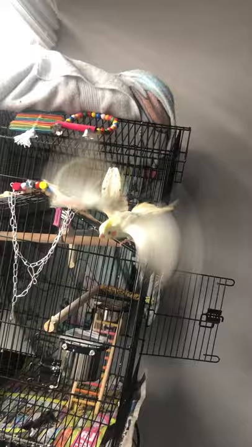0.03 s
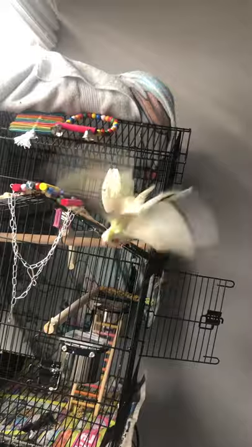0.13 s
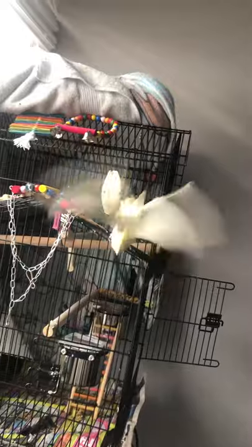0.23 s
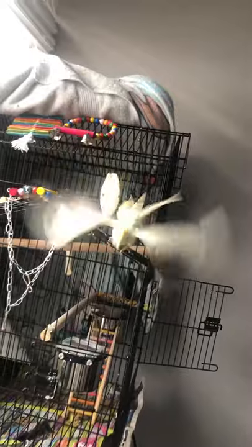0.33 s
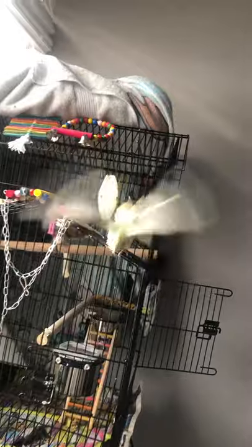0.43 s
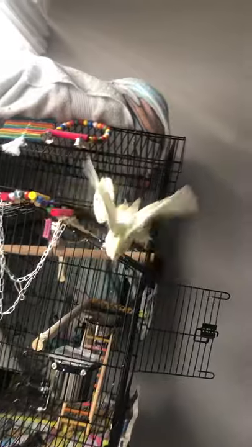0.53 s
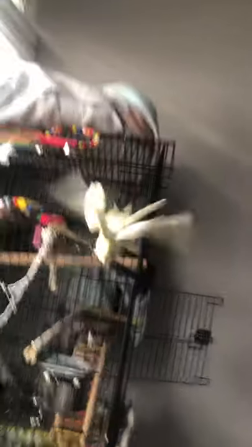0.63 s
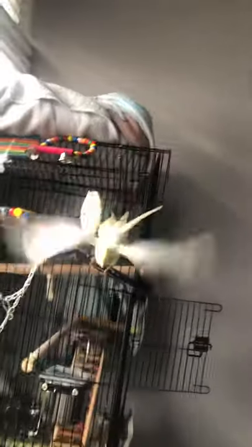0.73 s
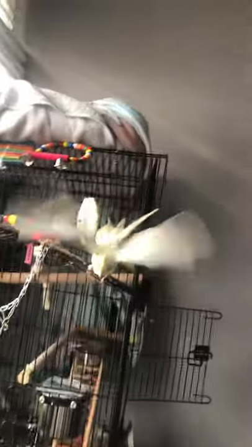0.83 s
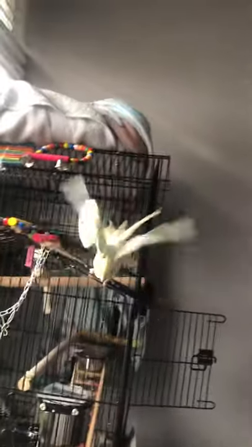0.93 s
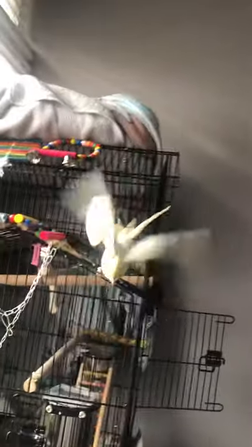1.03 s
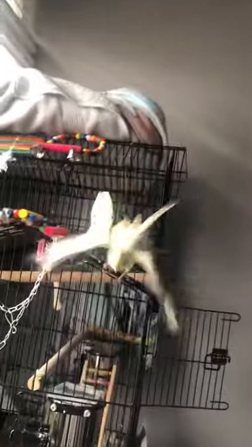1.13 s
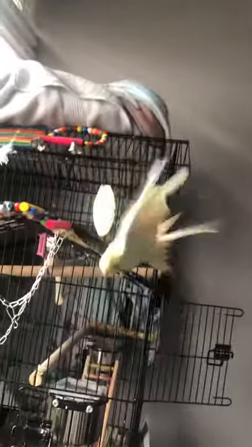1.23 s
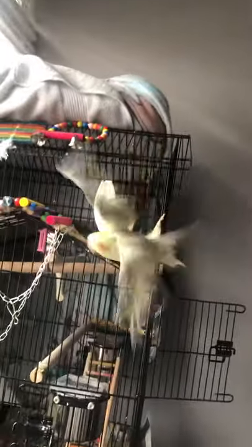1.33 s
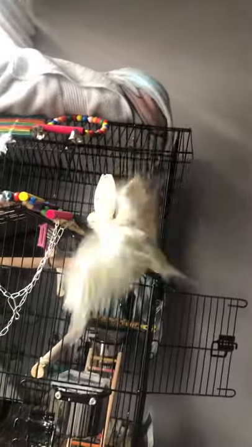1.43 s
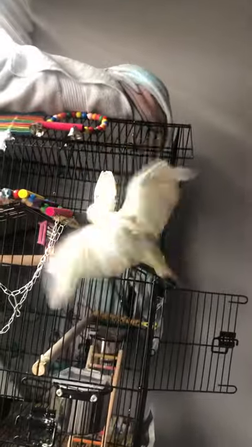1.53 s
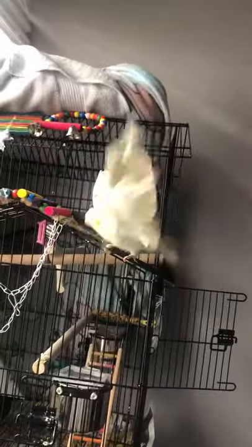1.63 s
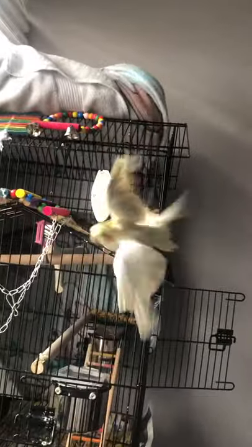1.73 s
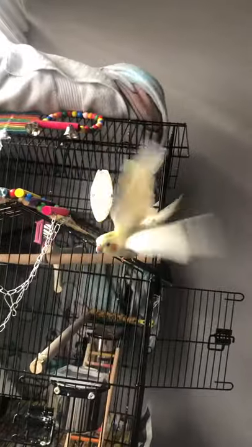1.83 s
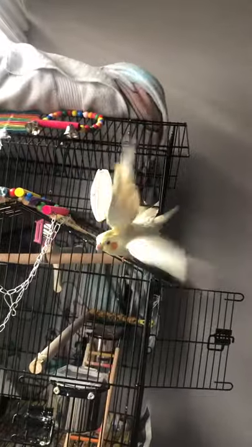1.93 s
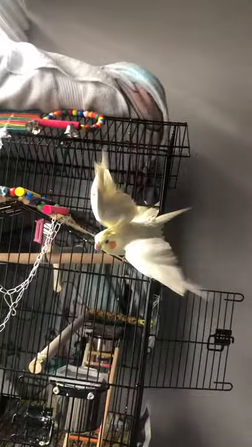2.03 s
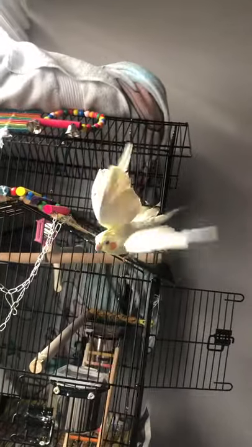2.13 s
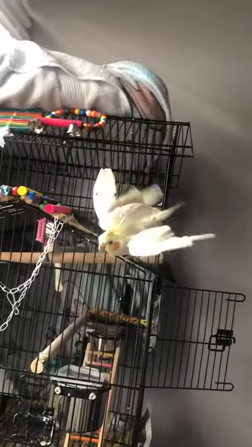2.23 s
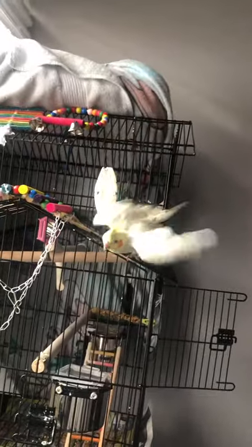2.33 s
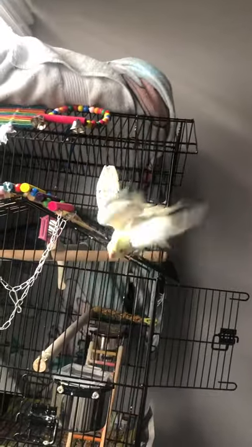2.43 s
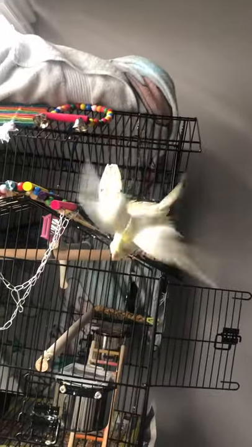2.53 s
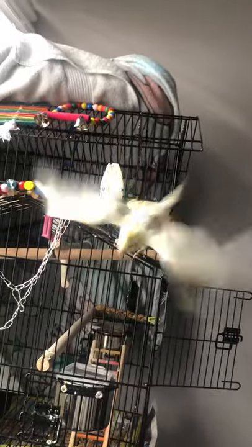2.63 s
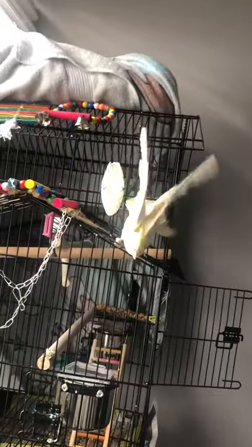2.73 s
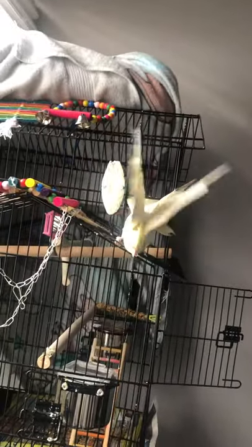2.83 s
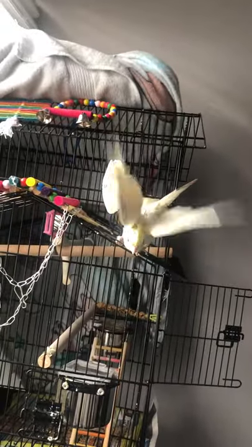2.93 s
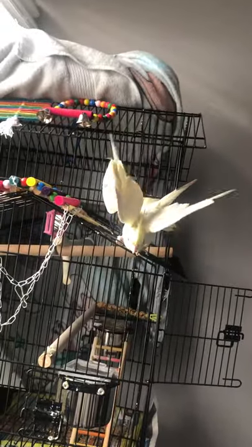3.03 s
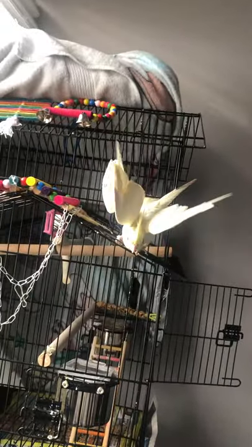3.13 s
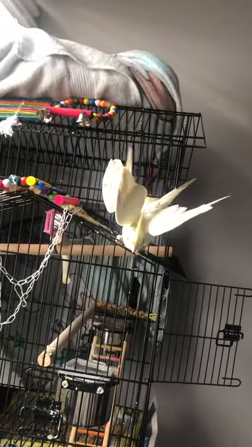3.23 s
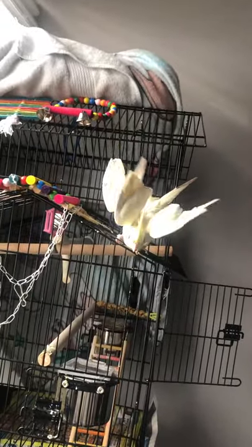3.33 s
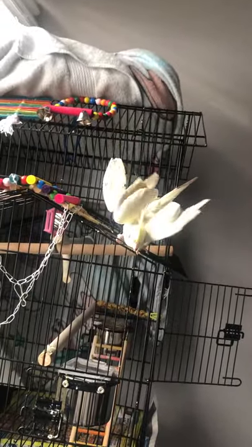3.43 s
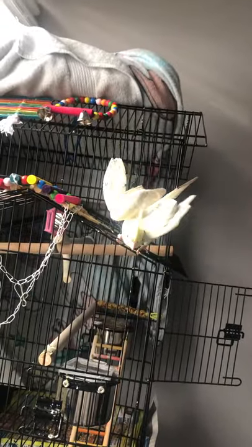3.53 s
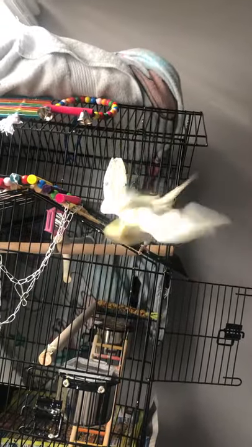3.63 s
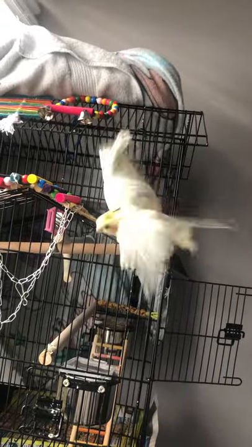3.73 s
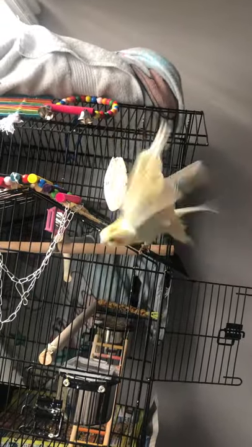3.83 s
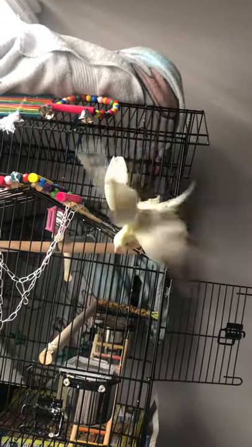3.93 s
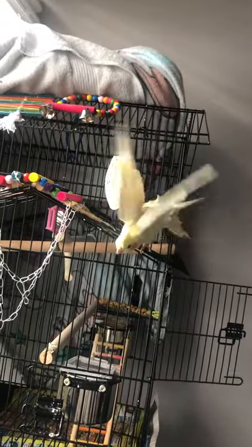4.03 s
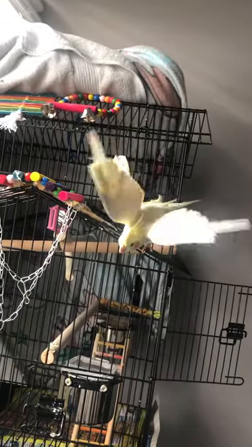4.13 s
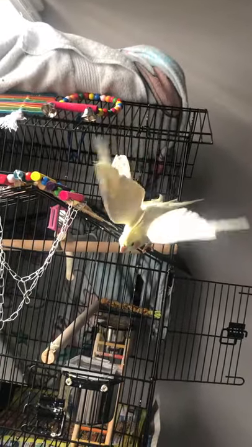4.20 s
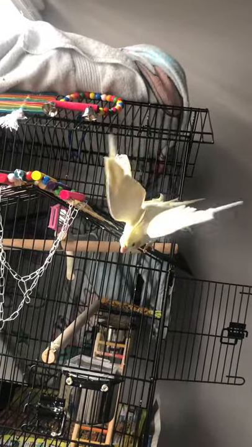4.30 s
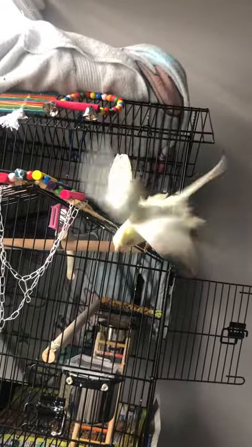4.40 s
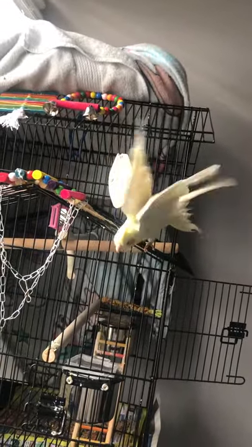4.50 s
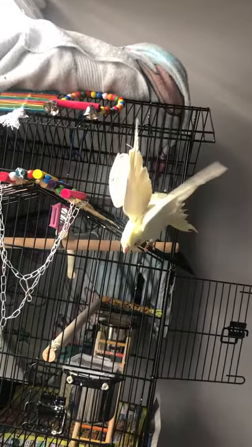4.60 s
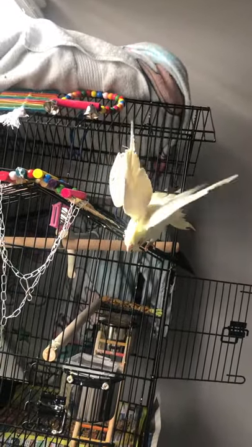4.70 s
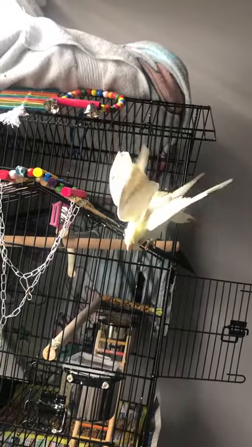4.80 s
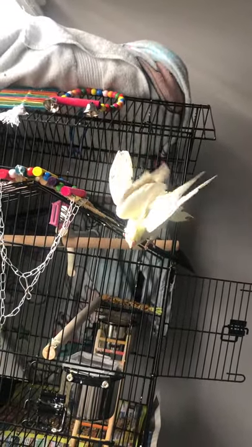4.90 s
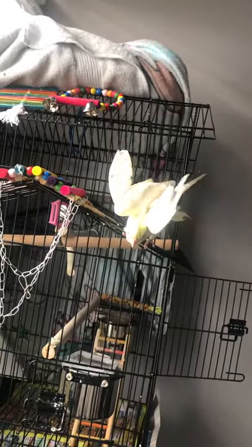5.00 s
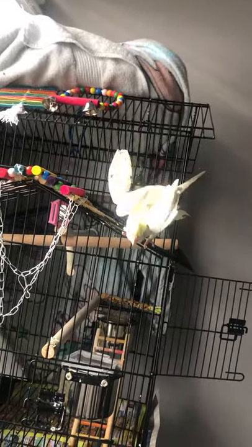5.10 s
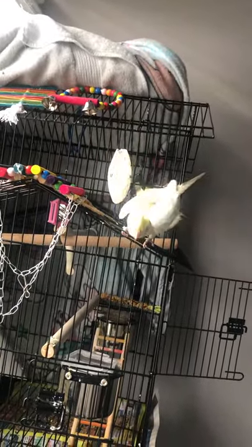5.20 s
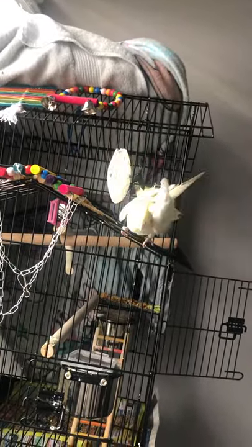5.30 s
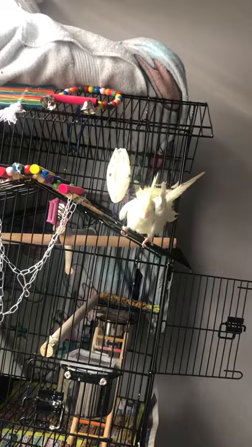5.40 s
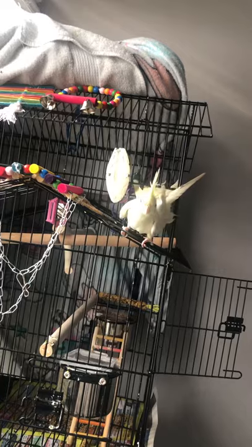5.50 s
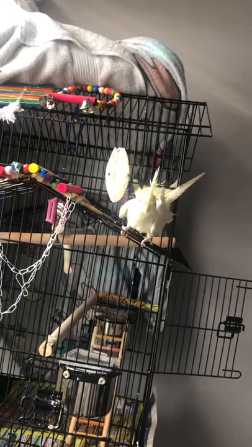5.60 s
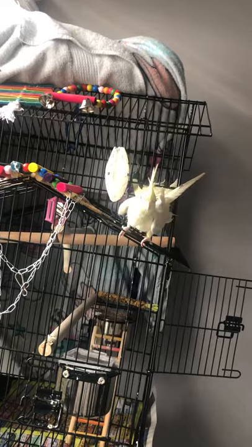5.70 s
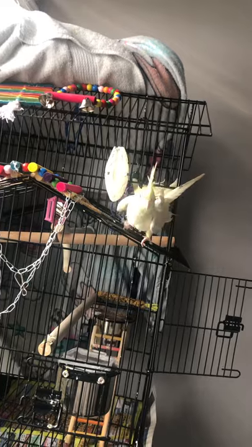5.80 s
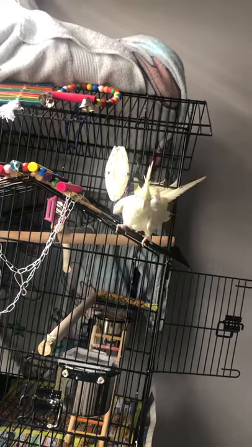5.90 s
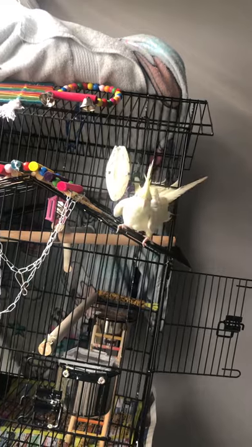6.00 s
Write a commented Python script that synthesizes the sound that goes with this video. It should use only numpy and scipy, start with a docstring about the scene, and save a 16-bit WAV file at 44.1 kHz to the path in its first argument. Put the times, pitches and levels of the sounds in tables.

```python
"""A cockatiel beats its wings, clinging to the top of a wire cage in a small room.
The feathers swish, push soft puffs of air and slap the wires; the shaken cage rattles and its bars ring.
At the end the bird folds its wings and ruffles its plumage over a low room rumble."""
import sys
import numpy as np
from scipy import signal
from scipy.fft import rfft, irfft, next_fast_len
from scipy.io import wavfile

SR = 44100
rng = np.random.default_rng(int(sys.argv[2]) if len(sys.argv) > 2 else 0)


def pcm_store(signal):
    """Save signal as 16-bit PCM."""
    levels = np.round(np.clip(np.atleast_2d(signal), -1, 1) * 32767)
    wavfile.write(sys.argv[1], SR, levels.astype(np.int16).T)


N = 266849
TIME_S = np.arange(N) / SR


# start_s, end_s, period_s, growth_s_per_beat, rattle_lead_s, rattle_re_swish_db
FLAP_BOUTS = [(0.088, 1.08, 0.101, 0.005, 0.053, 17.5), (1.222, 1.93, 0.108, 0, 0.022, 12.5),
              (2.15, 2.6, 0.123, 0, 0.01, 1), (3.585, 3.95, 0.106, 0, 0.002, 11.5)]
# time_s, swish_db
BEAT_EFFORT = [(0.08, -58.5), (0.3, -57.5), (0.76, -61.5), (1.03, -69), (1.22, -52.5), (1.44, -55),
               (1.88, -70), (2.15, -72), (2.52, -61), (3.58, -60), (3.69, -55), (3.9, -70)]

def wingbeats():
    """Even or slowing strokes that rock the cage. Rows: time_s, swish_db, rattle_s, rattle_db."""
    full_effort_db = -52
    rows = []
    for s, end_s, period_s, growth_s, lead_s, rattle_db in FLAP_BOUTS:
        while s < end_s:
            down_db = np.interp(s, *np.transpose(BEAT_EFFORT))
            up_db = down_db - 3 + 0.6 * (down_db - full_effort_db)  # upstrokes fade faster
            for stroke_s, db in [(s, down_db), (s + period_s / 2, up_db)]:
                rows.append((stroke_s, db, stroke_s - lead_s, db + rattle_db))
            s += period_s
            period_s += growth_s
    return rows


# peak_s, puff_db, half_length_s
HEAVY_DOWNSTROKES = [(0.295, -55, 0.02), (1.072, -51, 0.016), (1.36, -56.5, 0.06), (1.535, -52, 0.03),
                     (2.564, -59.5, 0.036), (3.637, -53, 0.015), (3.672, -50, 0.014), (4.32, -60, 0.02)]
# peak_s, swish_db, half_length_s
WING_FOLDS = [(3.31, -77.5, 0.059), (3.95, -72, 0.03), (4.12, -77, 0.04), (4.71, -76.5, 0.043),
              (4.85, -73.5, 0.069), (5.15, -79.5, 0.09)]
# freq_hz, density_db
SWISH_SPECTRUM = [(150, -22.5), (500, 0), (1200, -2.5), (2800, 1), (5000, -1.5), (8000, 1.5), (13000, -2.5),
                  (16000, -5.5)]

def wing_swish(half_length_s=0.022):
    """Vanes brush through the air and over each other as the wings beat and fold."""
    beats = [(s, db, half_length_s) for s, db, _, _ in wingbeats()]
    heavy = [(s, puff_db - 5, half_s) for s, puff_db, half_s in HEAVY_DOWNSTROKES]
    return swells(beats + heavy + WING_FOLDS) * noise(SWISH_SPECTRUM, grain_db=4.0)


# freq_hz, density_db
PUFF_SPECTRUM = [(20, -8), (45, -4), (110, 1.5), (180, -4), (280, -13), (550, -9), (1200, -29.5)]

def air_puffs(half_length_s=0.025):
    """Each stroke pushes a soft thud of air."""
    beats = [(s, swish_db - 5, half_length_s) for s, swish_db, _, _ in wingbeats()]
    air = swells(beats + HEAVY_DOWNSTROKES) * noise(PUFF_SPECTRUM)
    return air + amp(-7) * echo(air)


# freq_hz, gain_db
CRACK_SPECTRUM = [(60, -8), (180, -2), (350, -3.5), (700, -1), (2000, -0.5), (4000, -1.5), (8000, -0.5),
                  (13000, -1.5), (16000, -9)]
# start_s, strength_db, bright_hz, bright_db, body_db, echo_trim_db
WING_SLAPS = [(0.062, -27.5, 7040, 0.5, -1, 4), (0.169, -24, 8500, 6.5, -2.5, 3),
              (0.180, -25, 7000, 4.5, 2.5, 0), (0.279, -26, 6000, 1.5, 0, -3.5),
              (0.2958, -16, 7500, 4.5, 2.5, -2.5), (0.522, -32.5, 9000, 1.5, 2, -0.5),
              (0.759, -30, 12500, 3, -1, 2), (0.777, -30, 4960, 3, -1, -2.5), (1.061, -22, 1000, 4.5, 3, 2),
              (1.065, -14.5, 1300, 3.5, 6, 4), (1.325, -24.5, 6500, 3.5, -1.5, -1),
              (1.5186, -14.5, 5000, 3, -3, -5), (1.5386, -19, 6770, 2, -3, -3),
              (2.338, -30, 3040, 1.5, 3.5, 1), (2.5355, -18, 11000, 0.5, -1.5, 1),
              (2.543, -18, 6500, 2, 3.5, -1.5), (2.568, -19, 5900, 3.5, -1, 0),
              (3.620, -20.5, 2700, 6, -3, -0.5), (3.6618, -21.5, 7800, 2.5, 5, 0),
              (3.802, -33, 4070, 1, 2, 2), (4.2955, -12, 8150, 7, -2, 3), (4.306, -14.5, 7900, 8, 1, 1)]

def wing_slaps(t, tones, square_hit_db=-14, ring_db=-16):
    """A quill cracks on a wire, the neighbouring feathers clatter after it and the bars ring."""
    track = np.zeros(N)
    for s, db, bright_hz, bright_db, body_db, echo_trim_db in WING_SLAPS:
        def colour_db(hz):
            """A stiff tip favours one pitch region; the flat of the wing adds low body."""
            tip_db = bright_db * np.exp(-(np.log2((hz + 1) / bright_hz) / 0.43) ** 2)
            return along(CRACK_SPECTRUM, hz) + tip_db + body_db / (1 + (hz / 1500) ** 2)

        graze_db = max(square_hit_db - db, 0)  # weaker slaps graze and clatter more
        clatter_s = 0.0045 + 0.0003 * graze_db
        crack = burst(coloured(rng.standard_normal(len(t)) * np.exp(-t / 0.0004), colour_db))
        clatter = burst(coloured(contacts(t, clatter_s, spread_db=4.0), colour_db))
        hit = burst(crack + amp(-3 + 0.5 * graze_db) * clatter)
        slap = hit + amp(echo_trim_db - 5) * echo(hit) + amp(ring_db) * bar_ring(tones)
        add(track, s, amp(db - 9) * slap)
    return track


# start_s, strength_db, rocking_period_s
CAGE_JOLTS = [(1.453, -36.5, 0.108), (1.727, -44, 0.068), (2.613, -42.5, 0.064), (3.8, -44, 0.058),
              (4.432, -44.5, 0.05)]
# freq_hz, gain_db
BUZZ_SPECTRUM = [(200, -13), (700, -2), (1050, -11), (1350, -7), (1650, -11), (1980, 5), (2450, -14),
                 (2900, -9), (3250, 0), (3720, -14), (4250, 0.5), (4700, -12), (5150, -7), (5700, -16),
                 (6300, -6.5), (7000, -20), (15000, -28)]

def cage_rattles(t, tones, rebound_loss_db=9):
    """At every wingbeat and rebound, wire buzzes against wire and leaves the bars ringing."""
    track = np.zeros(N)
    attack = 1 - np.exp(-t / 0.0035)
    beats = [(s, db) for _, _, s, db in wingbeats()]
    rebounds = [(s + k * period_s, db - k * rebound_loss_db)
                for s, db, period_s in CAGE_JOLTS for k in range(3)]
    for s, db in beats + rebounds:
        chatter = attack * contacts(t, length_s=0.013, spread_db=3.5)
        buzz = burst(coloured(chatter, lambda hz: along(BUZZ_SPECTRUM, hz)))
        rattle = amp(2.5) * buzz + amp(-1.5) * echo(buzz) + amp(2) * attack * bar_ring(tones)
        add(track, s, amp(db) * rattle)
    return track


# pitch_hz, spread_hz, relative_db, t60_s
BAR_FAMILIES = [(478, 14, -10, 1.2), (685.6, 54, -2.5, 0.7), (782, 16, -4.5, 1.24), (1327, 70, -8, 0.82),
                (1669, 14, -12, 1.4), (1883, 20, 0.5, 0.58), (2012, 120, 1, .45), (3120, 60, -1, .4),
                (3354, 120, -3.5, .4), (4164, 57, 0, 0.37), (4420, 220, -6.5, .3), (5180, 240, -8.5, .3),
                (6160, 110, -8.5, 0.35)]

def bar_tones(t, bars_per_family=7):
    """One decaying complex tone per bar; nearly equal bars are slightly out of tune."""
    return np.array([amp(db - 60 * t / t60_s) * np.exp(2j * np.pi * (hz + spread_hz * offset) * t)
                     for hz, spread_hz, db, t60_s in BAR_FAMILIES
                     for offset in np.linspace(-1, 1, bars_per_family)
                     + rng.normal(0, 0.104, bars_per_family)])


def bar_ring(tones):
    """Each blow shares itself out anew among the bars."""
    shares = rng.standard_normal(len(tones)) + 1j * rng.standard_normal(len(tones))
    return burst((shares @ tones).real)


# time_s, level_db
RUFFLE_ENVELOPE = [(5.66, -100), (5.69, -64), (5.73, -69), (5.742, -60), (5.78, -70), (5.83, -71.5),
                   (5.92, -88.5)]
# freq_hz, density_db
RUFFLE_SPECTRUM = [(200, -12), (700, -1), (2000, -5.5), (3000, -6.5), (3900, 2.5), (5200, -6.5),
                   (6600, -1.5), (9000, -7.5), (14000, -8.5), (16000, -13)]

def plumage_ruffle():
    """Plumage shaken out in a short, grainy rustle."""
    level_db = np.interp(TIME_S, *np.transpose(RUFFLE_ENVELOPE), left=-120, right=-120)
    return amp(level_db) * noise(RUFFLE_SPECTRUM, grain_db=3.5)


# freq_hz, t60_s
ROOM_DECAY = [(150, 0.39), (1000, 0.44), (4000, 0.39), (8000, 0.27), (15000, .2)]

def echo(x):
    """Room reverberation from a unit-energy tail; the treble dies first."""
    hz, t, spectra = signal.stft(rng.standard_normal(SR // 2), SR, nperseg=256)
    decay = amp(-60 * t / along(ROOM_DECAY, hz)[:, None])
    tail = signal.istft(spectra * decay, SR, nperseg=256)[1]
    tail *= 1 - np.exp(-np.arange(len(tail)) / SR / 0.0021)
    return signal.fftconvolve(x, tail / np.linalg.norm(tail))[:len(x)]


# freq_hz, density_db
RUMBLE_SPECTRUM = [(15, -51.5), (25, -21.5), (48, -8.5), (123, -5.5), (200, -5), (439, -12), (560, -18.5),
                   (775, -17.5), (936, -22.5), (1700, -26), (2410, -28), (12200, -30), (16000, -37.5)]

def room_tone(hum_hz=60.5):
    """Low rumble and faint hiss with a trace of mains hum."""
    return amp(-67.5) * noise(RUMBLE_SPECTRUM) + amp(-74.5) * np.sin(2 * np.pi * hum_hz * TIME_S)


def swells(rows):
    """Bell-shaped envelopes summed in power."""
    return np.sqrt(sum(amp(db) ** 2 * np.exp(-((TIME_S - s) / half_s) ** 2) for s, db, half_s in rows))


def contacts(t, length_s, spread_db):
    """A dying shower of tiny contacts of very unequal size."""
    sizes = np.repeat(amp(spread_db * rng.standard_normal(len(t))), 8)[:len(t)]
    return rng.standard_normal(len(t)) * sizes * np.exp(-(t / length_s) ** 2)


def noise(spectrum, grain_db=0):
    """Coloured noise of rms 1, optionally in millisecond grains."""
    count = N // 40 + 2
    grains = np.interp(TIME_S, np.arange(count) * 40 / SR, rng.standard_normal(count))
    x = coloured(rng.standard_normal(N) * amp(grain_db * grains), lambda hz: along(spectrum, hz))
    return x / np.sqrt(np.mean(x ** 2) + 1e-20)


def coloured(x, gain_db):
    """Minimum-phase filter with response gain_db(hz)."""
    m = 2 * next_fast_len(len(x))
    cepstrum = irfft(np.log(amp(gain_db(np.fft.rfftfreq(m, 1 / SR)))), m)
    cepstrum[1:m // 2] *= 2
    cepstrum[m // 2 + 1:] = 0
    return irfft(rfft(x, m) * np.exp(rfft(cepstrum)), m)[:len(x)]


def along(points, hz):
    """Interpolate on a log frequency axis."""
    freq_hz, values = np.transpose(points)
    return np.interp(np.log(hz + 1), np.log(freq_hz + 1), values)


def burst(x):
    """Scale to the energy of 1 ms at rms 1."""
    return x * np.sqrt(SR / 1000 / (np.sum(x ** 2) + 1e-20))


def amp(db):
    """Decibels to gain."""
    return 10 ** (np.asarray(db) / 20)


def add(track, start_s, x):
    """Mix x into the track."""
    span = track[max(round(start_s * SR), 0):][:len(x)]
    span += x[:len(span)]


def scene():
    """Bird, cage and room in mono."""
    t = TIME_S[:SR]
    tones = bar_tones(t)
    cage = wing_slaps(t, tones) + cage_rattles(t, tones)
    feathers = wing_swish() + plumage_ruffle()
    return (cage + feathers + amp(-1.5) * echo(feathers) + air_puffs() + room_tone())[None]


def record(dry, low_cut_hz=26, top_hz=16200):
    """The microphone sheds the deepest rumble and everything above its band limit."""
    m = next_fast_len(N + SR // 2)
    hz = np.fft.rfftfreq(m, 1 / SR)
    response = hz ** 4 / (hz ** 4 + low_cut_hz ** 4) * (hz < top_hz)
    return irfft(rfft(dry, m) * response, m)[..., :N]


dry = scene()
out = record(dry)
pcm_store(out)
```